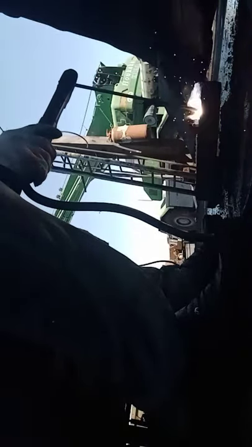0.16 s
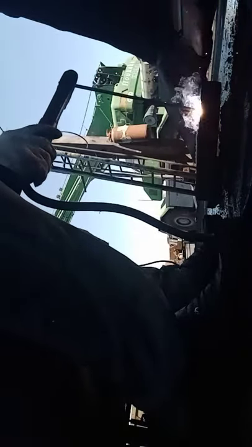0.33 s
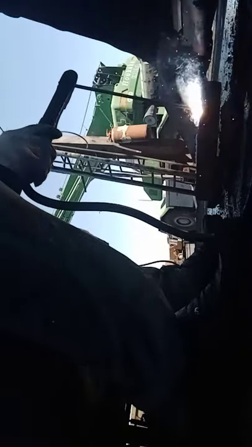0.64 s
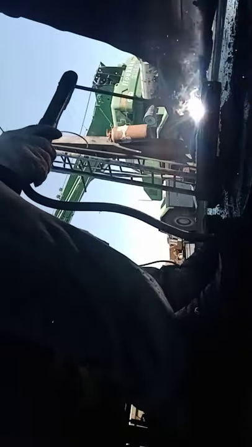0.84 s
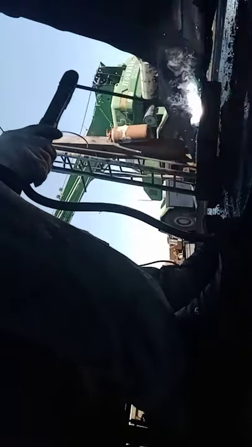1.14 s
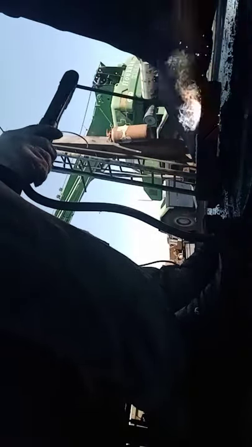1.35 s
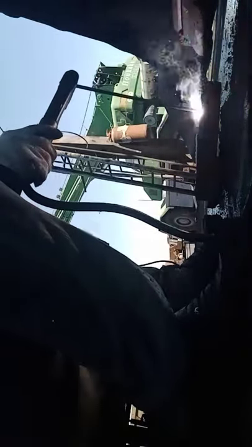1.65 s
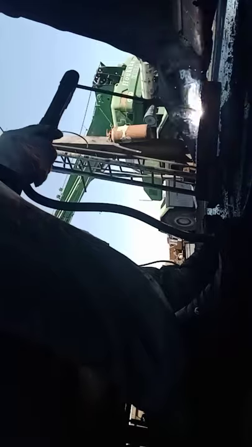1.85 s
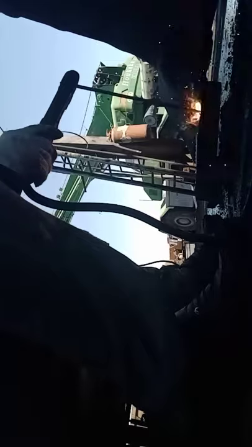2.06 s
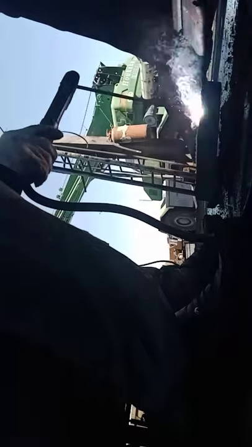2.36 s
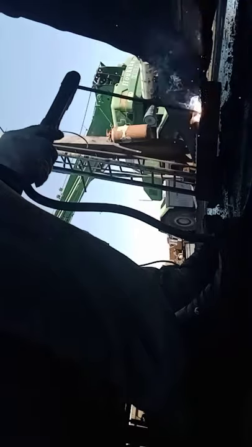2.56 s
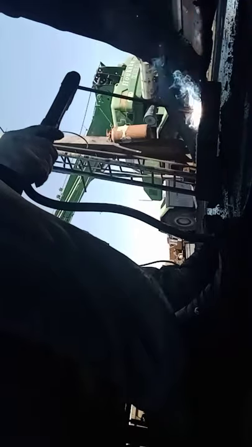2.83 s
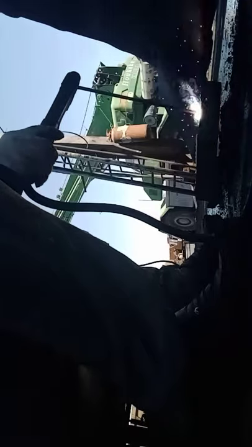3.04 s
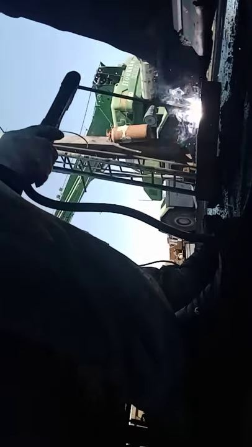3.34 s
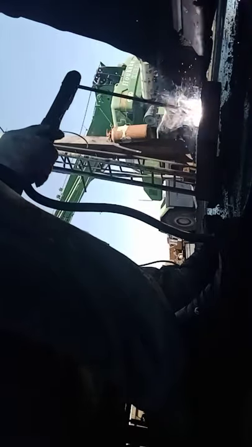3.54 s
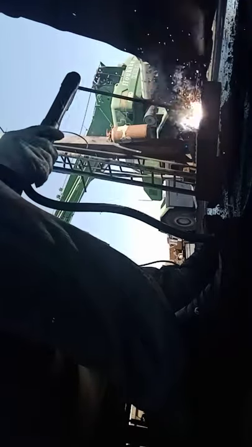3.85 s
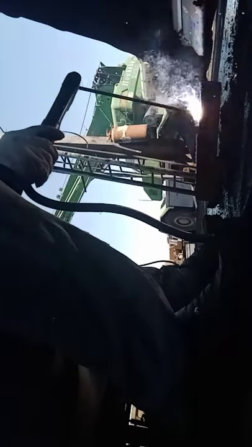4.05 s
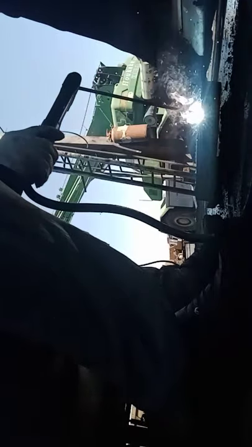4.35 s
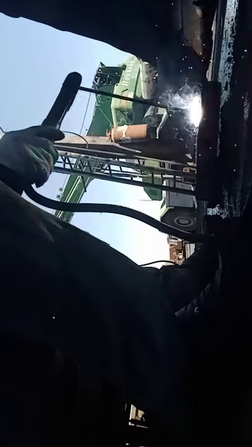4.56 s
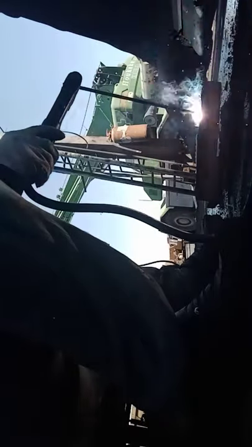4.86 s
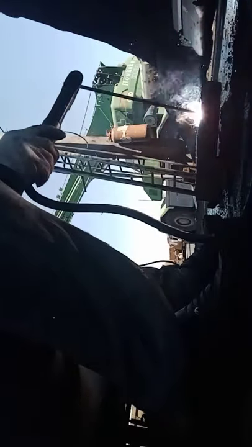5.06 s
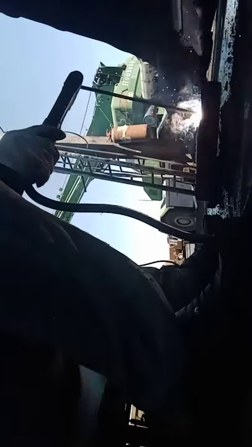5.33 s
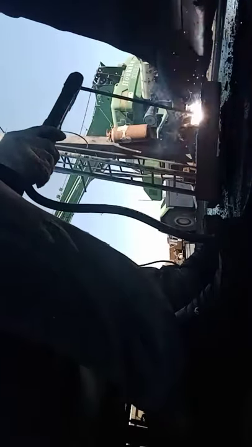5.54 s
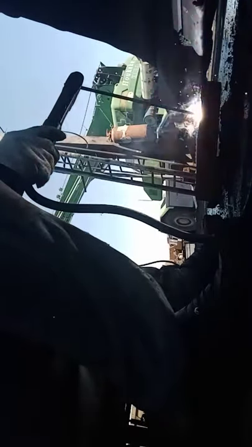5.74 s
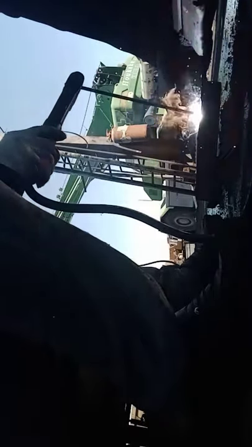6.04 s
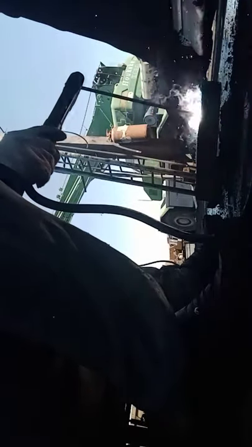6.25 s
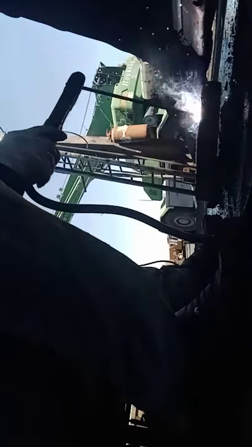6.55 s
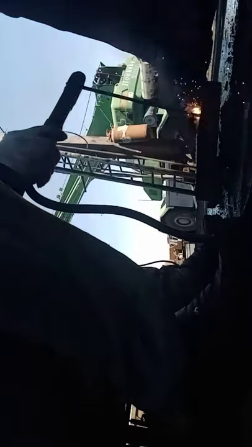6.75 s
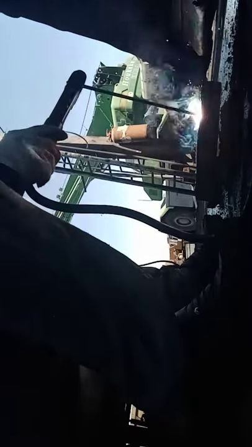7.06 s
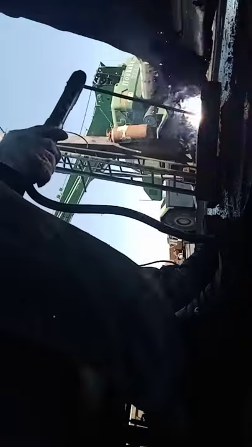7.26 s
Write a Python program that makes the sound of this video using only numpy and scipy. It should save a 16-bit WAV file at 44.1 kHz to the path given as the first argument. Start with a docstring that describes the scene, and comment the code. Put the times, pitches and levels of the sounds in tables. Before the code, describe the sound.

A stick welding arc burns on steel for about seven and a half seconds, close and slightly left of a phone microphone in an open shed. It hisses and fizzes throughout, with crackling sparks, a low flutter and many irregular sharp pops, some followed by a quick slap echo. The arc chokes for an instant again and again, most clearly around 0.3, 1, 1.5, 3.6, 5.6, 6 and 7.3 seconds, recovering each time. Pops crowd together around 4.5 seconds. Underneath, the welder hums softly and its fan gives a rush of air and a thin whine, dipping and swelling with the arc. A faint, very high squeak repeats about twice a second, mostly on the left. A light breeze rumbles on the left microphone, most noticeably near 3.4 and 7 seconds. Two short, dull knocks land on the right at about 5.6 and 6.8 seconds.

```python
"""A welding arc hisses, pops and flutters as a stick electrode burns on steel in an open shed.
It spits sparks, stalls when a drop of metal shorts it, and pops sharply, at times with a quick slap echo.
The welder hums, its fan whines, and something thin squeaks about twice a second.
A breeze buffets mostly the left microphone, and late on two dull knocks land by the right one.
The arc is to the left of a phone whose two microphone openings (ports) colour the sound differently."""
import sys
import numpy as np
from scipy import signal
from scipy.fft import rfft, irfft, next_fast_len
from scipy.io import wavfile
from scipy.ndimage import uniform_filter1d, map_coordinates

SR = 44100
rng = np.random.default_rng(int(sys.argv[2]) if len(sys.argv) > 2 else 0)


def generate_wav(sig):
    """Save sig (samples, or channels by samples) to the path in sys.argv[1] as 16-bit PCM at SR."""
    pcm = np.round(np.clip(np.atleast_2d(sig).T, -1, 1) * 32767).astype(np.int16)
    wavfile.write(sys.argv[1], SR, pcm)


N = 326340

# How strongly the arc burns between stalls: (time [s], relative level [dB])
ARC_LEVEL = [(0.0, -35.5), (0.38, -32), (0.43, -29), (0.53, -27), (0.74, -38), (0.91, -34.5), (1.26, -28),
             (1.76, -28.5), (2.04, -35), (2.26, -27.5), (2.61, -31.5), (3.04, -33), (3.68, -28.5),
             (4.07, -31.5), (4.16, -37), (4.71, -34), (5.18, -32.5), (5.32, -39), (5.75, -28.5),
             (6.23, -31), (6.6, -33), (7.07, -31.5), (7.4, -27)]
# Drops short the arc: (deepest moment [s], depth [dB], sinking time [s], recovery time [s])
ARC_STALLS = [(0.132, 7, 0.01, 0.086), (0.316, 15.5, 0.019, 0.045), (0.58, 5, 0.033, 0.017),
              (0.813, 4, 0.013, 0.0074), (1.0, 14, 0.024, 0.04), (1.131, 2.5, 0.035, 0.12),
              (1.404, 12, 0.014, 0.011), (1.515, 7, 0.005, 0.003), (1.541, 10, 0.11, 0.087),
              (1.795, 6, 0.022, 0.015), (2.125, 10.5, 0.0063, 0.052), (2.394, 3.5, 0.015, 0.039),
              (2.586, 7.5, 0.091, 0.028), (3.03, 7.5, 0.024, 0.07), (3.129, 8.5, 0.023, 0.051),
              (3.323, 3.6, 0.008, 0.029), (3.574, 12, 0.03, 0.043), (3.701, 4.5, 0.0065, 0.037),
              (3.93, 9.5, 0.089, 0.0096), (4.258, 2, 0.011, 0.043), (4.433, 6, 0.036, 0.012),
              (4.534, 5, 0.05, 0.069), (4.612, 7, 0.0057, 0.055), (4.729, 7, 0.019, 0.017),
              (4.851, 6.5, 0.042, 0.055), (5.025, 9.5, 0.071, 0.068), (5.493, 6.1, 0.019, 0.078),
              (5.604, 11.5, 0.026, 0.05), (5.964, 10, 0.05, 0.011), (6.007, 17.5, 0.028, 0.045),
              (6.281, 1.5, 0.023, 0.059), (6.468, 9, 0.016, 0.021), (6.673, 4, 0.023, 0.0065),
              (6.769, 12, 0.015, 0.0038), (6.792, 10.5, 0.011, 0.029), (6.96, 5, 0.011, 0.025),
              (7.103, 10, 0.016, 0.039), (7.254, 12.5, 0.029, 0.058)]
# Sharp pops of the arc and their quick slap echoes:
# (time [s], relative peak [dB], extra fizz, meaning high treble [dB])
POPS_AND_ECHOES = [(0.0213, -10.5, -5), (0.068, -17, 6), (0.108, -5.5, -9), (0.1352, -20.5, 16.5),
                   (0.2938, -17, 7), (0.314, -14.5, 4), (0.3223, -26.0, 11), (0.4005, -6, -2),
                   (0.5383, -7, -9), (0.5594, -5, -12), (0.6224, -19, 2), (0.6375, -5, -9),
                   (0.6813, -13.5, -5), (0.7261, -5, -9), (0.7437, -21.5, 18), (0.7615, -19, 3),
                   (0.799, -16, 5), (0.8682, -5, -5), (0.8829, -13.0, 8), (0.9637, -13.5, 4),
                   (0.9732, -18.5, 11), (1.006, -23, 12), (1.042, -14, -8), (1.0698, -9, -1),
                   (1.1431, -10, 3), (1.1676, -17, 7), (1.3221, -5.0, -3), (1.388, -6.0, -11),
                   (1.4469, -21, 5), (1.466, -7.5, 0), (1.5197, -8.5, 7), (1.528, -14, 7),
                   (1.5531, -16, 10.5), (1.7875, -13.0, 3), (1.9285, -12, 6), (1.9538, -11, -1),
                   (2.0102, -20, 15.5), (2.0414, -21, 13), (2.0686, -12, 6), (2.1076, -15.0, 15),
                   (2.1364, -7.5, 2), (2.1625, -8, -6), (2.4192, -6, -4), (2.4727, -10, 4), (2.51, -14, 3),
                   (2.551, -8.5, -4), (2.5649, -15, 9), (2.891, -11, 6), (2.9005, -11.5, 5),
                   (2.9141, -5, -6), (2.971, -5, -10), (2.9791, -10.0, -9), (3.017, -22, 7),
                   (3.1105, -21.5, 12), (3.1245, -13, 9), (3.1473, -14, -1), (3.1575, -15, 6),
                   (3.173, -9.5, -1), (3.2844, -6, -9), (3.3016, -9, -4), (3.369, -11, -1),
                   (3.428, -13, -7), (3.5506, -12, 6), (3.5588, -21.5, 8), (3.5805, -12, -6),
                   (3.7088, -11.0, 1), (3.7997, -10, 2), (3.834, -4.5, -4), (3.8608, -5, -13),
                   (3.8715, -12.5, -1), (3.886, -10.5, 7), (3.8944, -15, 9), (3.9189, -21.5, 11),
                   (4.1275, -12, -2), (4.1819, -12.5, 3), (4.2746, -18, 8), (4.2947, -18, 4),
                   (4.3429, -11, -2), (4.3766, -12.5, 5), (4.394, -15.5, 3), (4.4023, -10, 5),
                   (4.4286, -21, 12), (4.443, -14, 4), (4.4611, -8.5, 5), (4.4674, -8.5, 1),
                   (4.4916, -14, 7), (4.4981, -11.0, 2), (4.5049, -24, 13), (4.5392, -12, 3),
                   (4.5585, -17, 5), (4.5633, -16, 5), (4.5874, -13, -4), (4.595, -15.0, -2),
                   (4.6075, -13.5, 3), (4.6281, -10.5, 3), (4.7055, -14.0, 0), (4.714, -17.5, 7),
                   (4.75, -8, -5), (4.8212, -13, 4), (4.8855, -15, 0), (4.9244, -6.5, -13), (4.9616, -8, 5),
                   (4.9822, -15, 9.5), (5.0227, -20, 5), (5.0395, -12.5, 6), (5.092, -7, -8),
                   (5.212, -10.5, 1), (5.24, -19, 4), (5.2673, -17, 6), (5.2994, -11.5, 4), (5.308, -20, 1),
                   (5.364, -13, 6.5), (5.383, -19, 9), (5.4148, -18, 3), (5.4638, -10, -5),
                   (5.4709, -13.5, 7.5), (5.4987, -18, 4), (5.5258, -16.5, 5), (5.5591, -16, 4),
                   (5.5858, -20, 11), (5.596, -16, 6), (5.61, -12, 10), (5.619, -15, 8), (5.6702, -9, -6),
                   (5.685, -10, 2), (5.6932, -11.5, -1), (5.711, -21, 10), (5.856, -17, 10),
                   (5.9082, -8.5, 0), (5.9676, -22.5, 13), (5.979, -23, 11), (5.9974, -21, 9),
                   (6.0124, -14.5, 8), (6.0207, -20.5, 1), (6.047, -14.0, -6), (6.2338, -9.0, 2),
                   (6.2864, -11, -4), (6.3133, -10.0, 0), (6.32, -13, 8), (6.3592, -5, -5),
                   (6.3759, -7, -1), (6.3837, -19, 7), (6.4246, -5, -4), (6.4598, -6.5, 1),
                   (6.468, -15.0, 0), (6.515, -9.5, -1), (6.5233, -14, 6), (6.5937, -12, 0),
                   (6.636, -9.0, -5), (6.6531, -6, -11), (6.7281, -10.5, -6), (6.7532, -17, 5),
                   (6.7739, -9.5, 9), (6.7823, -7.5, 4), (7.057, -17, 6), (7.0842, -13, 2),
                   (7.0937, -14, 8), (7.1106, -11, 4), (7.1242, -9, -4), (7.1912, -9, 0),
                   (7.2029, -8.0, -5), (7.217, -15.0, 7), (7.2269, -11.5, 0), (7.2493, -13.5, 11),
                   (7.2575, -20, 11)]
# Fizz and flutter rise and fall against the arc: (time [s], fizz shift [dB], flutter shift [dB])
ARC_MIX = [(0, -1, -12), (.42, 0, -7), (.55, -2, -10), (1.2, -4.5, -7), (1.7, -2.5, -10), (2.3, -2, -6.5),
           (2.8, 0, -9.5), (3.4, -4, -9.5), (4.0, -1, -10), (4.6, -0.5, -18), (5.2, -0.5, -7),
           (5.8, -2, -14.5), (6.4, -3, -22), (6.9, 1.5, -17), (7.4, -4, -11)]
# Tone colour of arc, steel and port on each side: (frequency [Hz], gain [dB])
LEFT_COLOUR = [(600, -8.1), (900, -10.9), (1400, -1.5), (2300, -5.2), (3600, 0.5), (4500, -2.9),
               (6200, -3.0), (7700, -2.2), (8400, -8.9), (10200, -18.9), (11900, -18.9), (13200, -23.7),
               (14700, -8.7), (15400, -9.8)]
RIGHT_COLOUR = [(600, -9.9), (800, -9.7), (1400, -5.8), (2400, -7.0), (3600, -3.5), (6500, -4.2),
                (8000, -10.2), (9400, -11.3), (10300, -6.1), (11500, -3.2), (12700, -6.1), (13500, -8.8),
                (14600, -3.3), (15400, -6.1)]
# Peaks and dips from nearby steel: (frequency [Hz], width [Hz], left gain [dB], right gain [dB])
STEEL_PEAKS = [(1400, 50, 1.5, 1), (1520.0, 50.0, -1.8, -1.7), (1700, 50, 1, 1.5), (1950, 35, -2.5, -2.5),
               (1960.0, 190.0, 1.4, 3.3), (2150, 40, -3, -3), (2910.0, 70.0, 4.3, 2.3),
               (2960.0, 330.0, -4.7, -0.2), (3640, 40, 1.5, 1.5), (3740.0, 50.0, 0.7, -2.6),
               (4100.0, 220.0, -3.9, -0.9), (4330, 60, -2, -1), (4670, 70, 2, 0),
               (5190.0, 460.0, -2.3, -3.0), (6350.0, 80.0, -0.4, -3.3), (7110.0, 270.0, -3.3, 0.4),
               (7690, 60, 2, 1), (8260.0, 90.0, -2.5, -1.2), (9870.0, 500.0, 2.2, -1.9),
               (10080.0, 180.0, -4.5, 2.0), (10750.0, 150.0, -3.0, -1.1), (11390.0, 120.0, -3.5, 0.0),
               (12370.0, 140.0, -3.4, -0.1), (13390.0, 480.0, -3.0, -1.4)]
# Nearby steel shifts the wave at the right port: (frequency [Hz], phase lead [rad])
STEEL_PHASE = [(600, 0), (830, .9), (1000, .1), (1900, .1), (2100, .6), (2450, -.6), (2750, .4),
               (3100, -.4), (3250, .3), (3370, -1.4), (3700, -.4), (4050, 0), (4230, .8), (4350, -.9),
               (4600, -1.3), (4800, .3), (5000, -1.1), (5300, .2), (5520, -1.3), (5750, -.2), (6300, -.9),
               (6450, 1.3), (6600, 0), (7300, .3), (7500, -.2), (8000, .8), (8200, 1.5), (9000, -1),
               (9600, 0), (15000, -.8)]
# How much of the arc both ports have in common: (frequency [Hz], share of power [0 to 1])
COMMON_SHARE = [(100, .7), (400, .85), (900, .7), (1800, .8), (2250, .35), (2650, .7), (3000, .5),
                (3300, .3), (3600, .75), (3950, .78), (4400, .2), (4750, .45), (5900, .55), (6450, .15),
                (7200, .6), (7400, .35), (7650, .63), (8100, .5), (8500, .15), (9600, .35), (11000, .1),
                (12000, .4), (13200, .1), (14700, .5)]
# Tone colour of the flapping hot gas: (frequency [Hz], gain [dB])
FLUTTER_COLOUR = [(50, -41), (110, -15), (180, 3), (250, 0.5), (450, 3), (650, -2.5), (1000, -11)]
# Hum and fan notes: (pitch [Hz], base level [dB], left over right [dB], right phase lead [rad])
WELDER_TONES = [(138, -55, 4, -.5), (239.6, -59, 4, -.8), (338.6, -56.5, 4, -1), (404, -57, -2.4, -1.2),
                (728, -64, 2.7, 1.3), (2426.5, -54, 7, .7), (4466, -53.5, 5, -.4), (6695, -53, 6, 1.5)]
# The whine near 2 kHz: (time [s], base level [dB])
WHINE_LEVEL = [(0, -43), (.3, -41), (.5, -42), (.65, -44.5), (1.3, -44.5), (2.3, -56), (2.75, -44.5),
               (3.6, -55), (4.1, -48), (5.9, -66), (6.5, -49), (7.4, -54)]
# Tone colour of the fan's rushing air: (frequency [Hz], gain [dB])
FAN_COLOUR = [(30, -30), (60, -18), (150, 9.5), (500, 7), (1500, -18), (5000, 6.5), (15000, -35)]
# Thin squeaks: (start [s], length [s], first pitch [Hz], last pitch [Hz], relative level [dB])
SQUEAK_EVENTS = [(0.088, 0.05, 6670, 6700, -38), (0.49, 0.12, 6530, 6700, -28.5),
                 (0.832, 0.034, 6550, 6690, -31), (1.203, 0.076, 6750, 6650, -33),
                 (1.657, 0.085, 6640, 6620, -27), (2.086, 0.046, 6620, 6600, -28.5),
                 (2.564, 0.052, 6600, 6620, -35), (3.082, 0.038, 6540, 6560, -32.5),
                 (3.614, 0.11, 6520, 6660, -35), (4.116, 0.068, 6600, 6740, -26.5),
                 (4.595, 0.074, 6560, 6670, -35), (5.234, 0.059, 6400, 6580, -29.5),
                 (5.71, 0.12, 6660, 6700, -31), (6.325, 0.096, 6700, 6710, -27.5),
                 (6.919, 0.062, 6600, 6720, -28)]
# Gusts of the breeze: (time [s], relative level [dB])
BREEZE_LEVEL = [(0, -61), (.3, -58), (.47, -42), (.62, -59), (.9, -74), (1.3, -42.5), (2.1, -82),
                (2.92, -41), (3.1, -51.5), (3.35, -34.5), (3.55, -45.5), (3.9, -56), (4.4, -68), (5.1, -55),
                (5.8, -54), (6.3, -46.5), (6.6, -51), (6.85, -48), (7.0, -35.5), (7.15, -48), (7.4, -55)]
# Tone colour of wind on a port: (frequency [Hz], gain [dB])
BREEZE_COLOUR = [(25, -35), (45, -16), (60, -3), (110, -0.5), (170, -3), (300, -30)]
# Dull knocks near the right port: (time [s], left strength [dB], right strength [dB])
KNOCK_EVENTS = [(5.611, -42, -9), (6.7731, -17, -7.5)]
# The microphones weaken the lowest and highest sounds: (frequency [Hz], gain [dB])
MIC_RESPONSE = [(20, -30), (50, 0), (15450, 0), (15550, -20), (15900, -30), (16600, -36)]

RIGHT_LAG_S = 34 / 44100  # the right port hears the arc this much later


def amp(db):
    """Turn decibels into a factor to multiply by."""
    return 10 ** (np.asarray(db) / 20)


def unit(x):
    """Scale a signal to an average power of 1."""
    return x / np.sqrt(np.mean(x ** 2) + 1e-20)


def along(points, hz):
    """Read between (frequency, value) points on a log frequency axis."""
    freqs, values = np.transpose(points)
    return np.interp(np.log(hz + 1), np.log(freqs + 1), values)


def curves(rows):
    """One value per sample for each column after the time."""
    times, *columns = np.transpose(rows)
    return [np.interp(np.arange(N) / SR, times, column) for column in columns]


def wobble(rate):
    """A smooth curve through `rate` random values a second."""
    return map_coordinates(rng.standard_normal(int(N * rate / SR) + 4), [np.arange(N) * rate / SR])


def filtered(x, response):
    """Scale and shift each frequency in x by response(hz)."""
    size = next_fast_len(N + SR // 2, True)
    return irfft(rfft(x, size) * response(np.fft.rfftfreq(size, 1 / SR)), size)[..., :N]


def causal(db):
    """A filter with these gains that never rings ahead of a sound (minimum phase)."""
    cepstrum = irfft(np.log(amp(db)))
    k = np.arange(cepstrum.shape[-1])
    fold = np.clip(2 * (k < len(k) // 2) - (k == 0), 0, 2)
    return np.exp(rfft(cepstrum * fold))


def delay(hz, seconds):
    """A filter that makes a sound arrive later."""
    return np.exp(-2j * np.pi * hz * seconds)


def decay(x, fade_s):
    """Give each click a tail that falls 60 dB in fade_s."""
    return signal.lfilter([1], [1, -amp(-60 / (fade_s * SR))], x)


def burn_db():
    """The arc's strength drifts slowly and dips whenever a drop shorts it."""
    t = np.arange(0, N / SR, .001)
    dip_db = sum(depth_db * np.exp(-((t - at) / np.where(t < at, sink, recover)) ** 2)
                 for at, depth_db, sink, recover in ARC_STALLS)
    return curves(ARC_LEVEL)[0] - np.interp(np.arange(N) / SR, t, dip_db)


def arc():
    """Hiss and sparks follow the burn, and a drop chokes the arc just before it pops."""
    t = np.arange(N) / SR
    arc_db = burn_db() + 0.82 * wobble(28)
    # The fizz swings less than the arc, and a little later.
    swing_db = 0.73 * (np.interp(t - 0.0035, t, arc_db) + 30.5)
    fizz_db = swing_db - 33.5 + curves(ARC_MIX)[0] + 1.5 * wobble(30)
    body_pops, fizz_pops, choke_db = pops()
    body_gain = amp(arc_db - choke_db + 8.5)
    fizz_gain = amp(fizz_db - choke_db + 10)
    roughness = amp(2.3 * np.tanh(wobble(66)) + 1.1 * np.tanh(wobble(200)))
    spit = sparks(rate=600, spread_db=0) + amp(-5.5) * sparks(rate=66, spread_db=1.5)
    body = crackle(clicks=body_pops + amp(-4.5) * body_gain * spit,
                   hiss=amp(3.5) * body_gain * roughness, spray_db=-14, tail_db=-29)
    fine_spit = spit + amp(2) * sparks(rate=80, spread_db=2.5)
    fizz = crackle(clicks=fizz_pops + amp(-5.5) * fizz_gain * fine_spit,
                   hiss=amp(6) * fizz_gain * roughness, spray_db=-11.5, tail_db=-39)
    lows = filtered(body, lambda hz: 1 - high_pass(hz, 8450))
    highs = filtered(fizz, lambda hz: high_pass(hz, 6150))
    return arc_at_ports(lows + highs)


def sparks(rate, spread_db):
    """Sparks click in random clumps; spread_db makes a few louder than the rest."""
    hits = rng.random(N) < rate / SR * amp(2.5 * np.tanh(wobble(40)))
    sizes = amp(spread_db * np.minimum(rng.exponential(size=N), 3.5))
    return unit(hits * sizes)


def pops():
    """Sharp pops of the arc and their quick slap echoes, with a dip in level leading up to each."""
    body, fizz, dip_db = np.zeros((3, N))
    for at, peak_db, extra_fizz_db in POPS_AND_ECHOES:
        i = round(at * SR)
        body[i] = amp(peak_db + 11.5)
        fizz[i] = amp(peak_db + extra_fizz_db + 11)
        dip_db[i] = max(4.5 + 0.3 * extra_fizz_db, 0)  # deeper before bright pops
    choke_db = decay(dip_db[::-1], fade_s=.045)[::-1]  # run backwards, so it grows towards the pop
    return body, fizz, choke_db


def crackle(clicks, hiss, spray_db, tail_db):
    """Each click is a sharp suction spike with a quick spray and a noisy tail, over the hiss."""
    spray = amp(spray_db) * decay(clicks, fade_s=.006) * np.sign(rng.standard_normal((3, N)))
    tail = amp(tail_db) * decay(clicks, fade_s=.027)
    noise = np.hypot(hiss, tail) * rng.standard_normal((3, N))
    return np.vstack([-clicks, spray + noise])  # rows: spikes, common noise, left noise, right noise


def high_pass(hz, corner_hz):
    """A gain that rises smoothly from 0 below the corner to 1 above it."""
    return 1 / (1 + (corner_hz / (hz + 1)) ** 4)


def port_db(hz):
    """Tone colour at the left and right port, with the steel's peaks and dips."""
    steel_db = sum(np.exp(-.5 * ((hz - centre) / width) ** 2) * [[left_db], [right_db]]
                   for centre, width, left_db, right_db in STEEL_PEAKS)
    return np.array([along(LEFT_COLOUR, hz), along(RIGHT_COLOUR, hz)]) + steel_db


def arc_at_ports(rows):
    """Each port hears common and scattered sound in its own colour, the right one later."""
    ripple_hz, ripple_db = 45, 1.6  # close echoes in the shed ripple the colour: spacing, depth
    ripples = rng.standard_normal((2, int(SR / 2 / ripple_hz) + 4))

    def response(hz):
        echo_db = ripple_db * np.array([map_coordinates(side, [hz / ripple_hz]) for side in ripples])
        lag = delay(hz, np.array([[0], [RIGHT_LAG_S]]))
        steel_shift = np.exp(1j * along(STEEL_PHASE, hz) * [[0], [1]])
        colour = causal(port_db(hz) + echo_db) * lag * steel_shift
        share = along(COMMON_SHARE, hz)
        return np.array([colour, np.sqrt(share) * colour, np.sqrt(1 - share) * colour])

    spikes, common, scattered = rows[[0, 0]], rows[[1, 1]], rows[2:]
    return filtered(np.array([spikes, common, scattered]), response).sum(0)


def flutter():
    """The plume of hot gas flaps in lumps, louder when the arc burns harder."""
    level_db = burn_db() + curves(ARC_MIX)[1] + 4 * np.tanh(wobble(11)) + 2.5
    lumps = amp(3.6 * np.tanh(wobble(30)) + 10 * np.tanh(wobble(150)))
    common, own = rng.standard_normal(N), rng.standard_normal((2, N))
    flap = unit(filtered(lumps * (common + 0.5 * own), lambda hz: amp(along(FLUTTER_COLOUR, hz))))
    stereo = amp(level_db) * flap * amp([[1.8], [-1.8]])
    return filtered(stereo, lambda hz: np.array([np.ones_like(hz), delay(hz, RIGHT_LAG_S)]))


def tone(hz, db, pan_db, lead):
    """A pure note, pan_db louder on the left and `lead` radians ahead on the right."""
    phase = 2 * np.pi * (np.cumsum(hz + np.zeros(N)) / SR + rng.random())
    gain = np.sqrt(2) * amp(db) * amp([[pan_db / 2], [-pan_db / 2]])
    return gain * np.sin(phase - np.array([[lead], [0]]))


def welder():
    """Hum and fan whines dip and swell with the arc's loudness, over a steady rush of air."""
    arc_swell_db = uniform_filter1d(burn_db(), size=1500) + 32
    notes = sum(tone(hz * (1 + 0.000534 * wobble(4)), db + 3.1 * wobble(5.8), pan_db, lead)
                for hz, db, pan_db, lead in WELDER_TONES)
    whine_hz = 2022 + 5 * wobble(20)
    whine_db = curves(WHINE_LEVEL)[0] + 0.27 * arc_swell_db + 3 * np.tanh(wobble(18))
    whine = tone(whine_hz, whine_db, pan_db=1.5, lead=.02)
    hum = tone(hz=119.8 + 1.55 * wobble(8), db=-45.5 + arc_swell_db + 2.3 * wobble(13),
               pan_db=3.3, lead=-0.84)
    air = filtered(rng.standard_normal((2, N)), lambda hz: amp(along(FAN_COLOUR, hz) + port_db(hz)))
    return amp(0.81 * arc_swell_db) * (notes + whine) + hum + amp(-45.5) * unit(air)


def squeaks():
    """A thin, wavering note starts fast, throbs and fades, mostly on the left."""
    t = np.arange(N) / SR
    hz, gain = np.full(N, 6650.), np.zeros(N)
    for start, length, first_hz, last_hz, db in SQUEAK_EVENTS:
        progress = (t - start) / length
        on = (progress > 0) & (progress < 1)
        hz[on] = first_hz + (last_hz - first_hz) * np.sqrt(progress[on])
        gain[on] = amp(db) * np.sin(np.pi * progress[on] ** 0.6)
    return gain * tone(hz + 90 * wobble(200), db=6 * np.tanh(wobble(120)) - 2.5, pan_db=8.5, lead=1.45)


def breeze():
    """Wind hits the ports with a low, lumpy rumble, much stronger on the left."""
    lumps = amp(5.8 * np.tanh(np.array([wobble(25), wobble(27)])))
    buffet = filtered(lumps * rng.standard_normal((2, N)), lambda hz: amp(along(BREEZE_COLOUR, hz)))
    through_case = buffet[0] * [[0], [.3]]  # a little of the left reaches the right
    return amp(curves(BREEZE_LEVEL)[0] + 3) * unit(buffet * amp([[7], [-4]]) + through_case)


def knocks():
    """Each dull knock is one quick push and a slower pull, without ringing."""
    push_s, rise_s = 0.0017, 0.00017
    t = np.arange(SR // 20) / SR
    pulse = (1 - t / push_s) * np.exp(-t / push_s) * (1 - np.exp(-t / rise_s))
    stereo = np.zeros((2, N + SR))
    for at, left_db, right_db in KNOCK_EVENTS:
        stereo[0, round(at * SR):][:len(t)] += amp(left_db) * pulse
        stereo[1, round((at + RIGHT_LAG_S) * SR):][:len(t)] += amp(right_db) * pulse
    return stereo[:, :N]


def scene():
    """All the sounds added together at the two ports."""
    return arc() + flutter() + breeze() + welder() + squeaks() + knocks()


def record(dry):
    """The microphones weaken deep bass and high treble, and keep nothing above top_hz."""
    top_hz = 16715
    return filtered(dry, lambda hz: causal(along(MIC_RESPONSE, hz)) * (hz < top_hz))


dry = scene()
out = record(dry)
generate_wav(out)
```